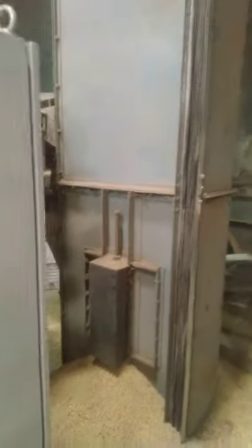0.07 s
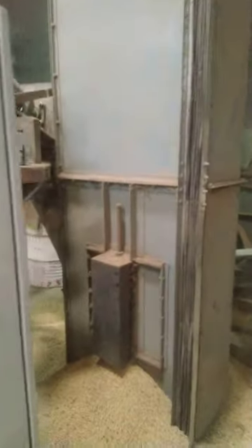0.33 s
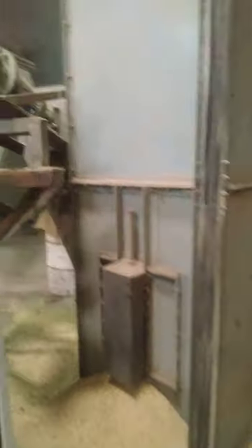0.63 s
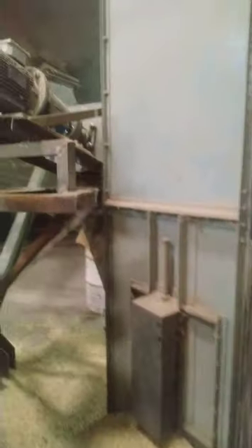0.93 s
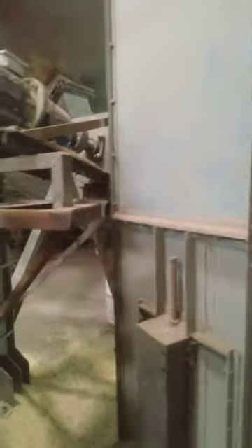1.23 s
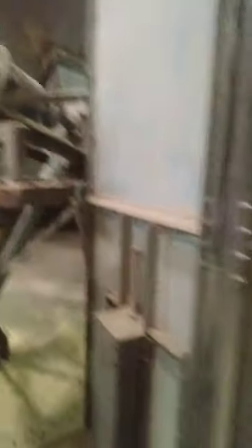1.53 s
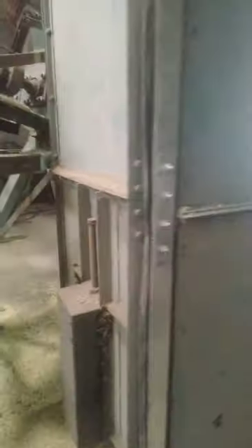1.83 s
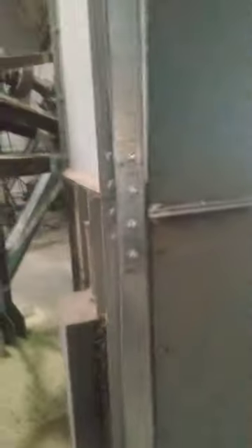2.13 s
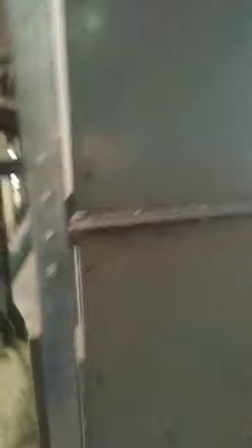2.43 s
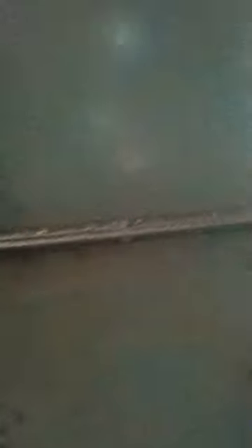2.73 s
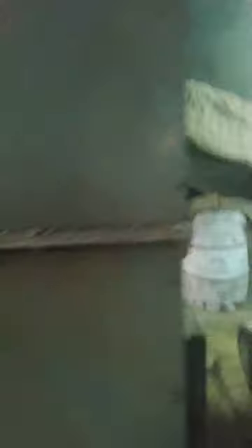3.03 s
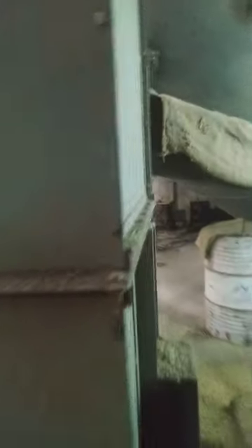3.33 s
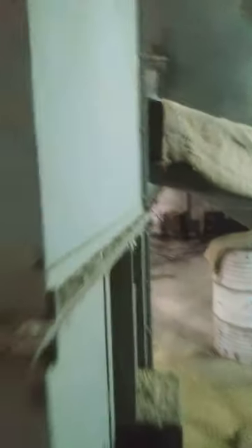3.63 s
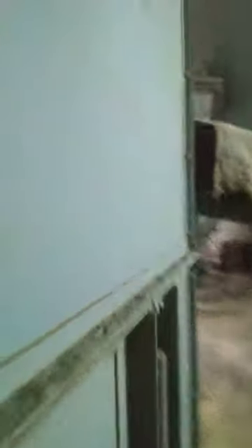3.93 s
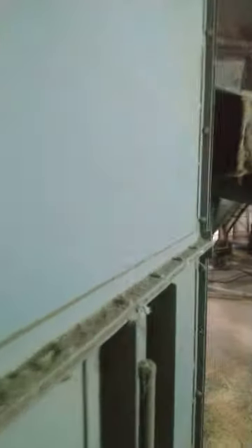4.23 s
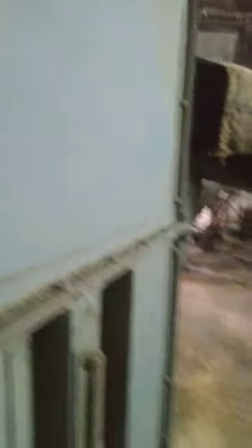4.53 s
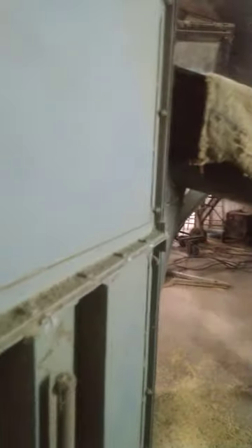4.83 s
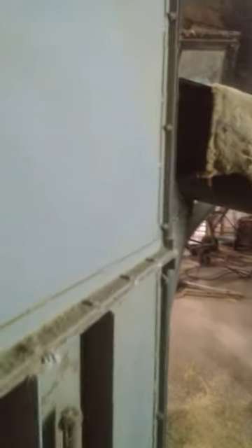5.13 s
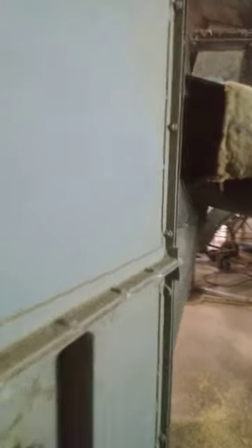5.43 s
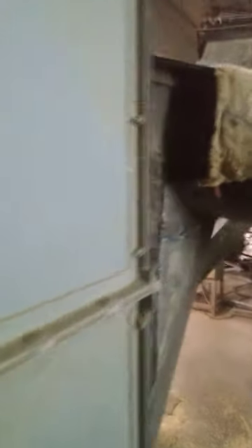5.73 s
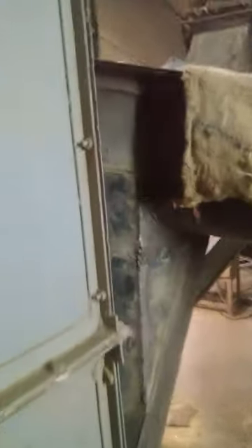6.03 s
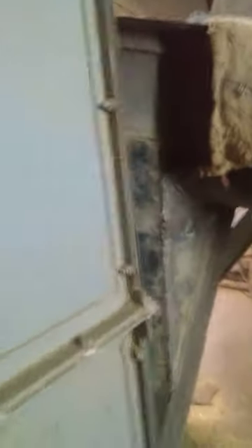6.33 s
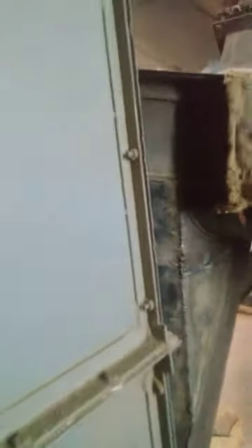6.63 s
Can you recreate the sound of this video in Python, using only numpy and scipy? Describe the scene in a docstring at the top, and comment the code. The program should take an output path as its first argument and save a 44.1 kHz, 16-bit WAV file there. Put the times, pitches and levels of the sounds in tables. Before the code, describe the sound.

Heavy machinery drones without a break inside a metal building: rumbling ducts, a rush of air, wavering motors and the hiss of sliding grain. As the microphone moves along the steel casing, hollow tones shift and the drone rises slightly. Stray kernels give a few small ticks, the fan's hum grows to its fullest, and a low hollow resonance builds near the end.

```python
"""A grain dryer runs in a sheet-metal hall while a phone is carried slowly past its casing.
It opens on duct rumble, rushing air, hissing grain and thin motor tones, with hollow resonances
swelling between the steel panels. Around 2 s the casing drone rises; then a few kernels tick on steel.
From 4 s the casing shades the air and the big fan's blade hum is at its fullest.
Near 6 s the hum eases back and a deep hollow boom swells over the rumble."""
import sys
import numpy as np
from scipy import signal
from scipy.fft import irfft, next_fast_len
from scipy.io import wavfile
from scipy.ndimage import map_coordinates

SR = 44100
rng = np.random.default_rng(int(sys.argv[2]) if len(sys.argv) > 2 else 0)


def to_wav(s):
    """Save 16-bit WAV."""
    ch = np.atleast_2d(s).T  # columns
    pcm = np.round(np.clip(ch, -1, 1) * 32767)  # PCM
    wavfile.write(sys.argv[1], SR, pcm.astype(np.int16))


N = 295029
T = np.arange(N) / SR
SIZE = next_fast_len(N, real=True)
FREQ = np.maximum(np.arange(SIZE // 2 + 1) * SR / SIZE, 1)

# how far the casing screens the phone from air, grain and drone: (time [s], shade [0-1])
SHADE = [(0, 0.02), (1.8, 0.22), (3.6, 0.39), (4.35, 0.93), (5.3, 0.98), (6, 0.57), (6.69, 0.9)]


def undb(db):
    """Decibels to gain."""
    return 10 ** (np.asarray(db) / 20)


def curves(table):
    """Each column of a table, joined by straight lines in time."""
    s, *columns = np.transpose(table)
    return [np.interp(T, s, c) for c in columns]


def spectra(table):
    """Each column of a table, joined by straight lines in log frequency."""
    hz, *columns = np.transpose(table)
    return [np.interp(np.log(FREQ), np.log(hz), c) for c in columns]


def pan(db):
    """Left and right gains for a pan in dB, left minus right."""
    return undb(np.array([[.5], [-.5]]) * db)


def unit(pair):
    """Scale a stereo pair so that its middle has rms 1."""
    return pair / np.std(pair.mean(axis=0))


def wander(rate):
    """Smooth random drift with about `rate` turns a second and a spread near 1."""
    knots = rng.standard_normal(1024)
    return map_coordinates(knots, [T * rate], order=2, mode="wrap")


def passing(s, reach):
    """Nearness 0-1 of a spot that the phone passes at time s."""
    return np.exp(-((T - s) / reach) ** 2)


def swell(spots):
    """Rise in dB while the phone passes loud spots."""
    return sum(db * passing(s, reach) for s, reach, db in spots)


def resample(pair, seconds):
    """Read a stereo loop at moving times."""
    return np.array([np.interp(seconds * SR % SIZE, np.arange(SIZE), channel) for channel in pair])


def microphone_ports():
    """Stereo image: likeness of the two ports and their complex gains at each frequency."""
    # (frequency [Hz], likeness [0-1], pan [dB], lead of the left port [rad])
    stereo_image = [(60, 0.99, 6, 0.4), (195, 0.92, 2, -0.18), (414, 0.65, 4, 0.07), (700, 0.47, 3.5, 0.6),
                    (1230, 0.6, 5, 1.47), (2130, 0.15, 7, 2), (4370, 0, 6, -0.5), (8040, 0.06, 1, -1.3),
                    (14000, 0, 0.5, 0)]
    likeness, pan_db, lead = spectra(stereo_image)
    gains = pan(pan_db) * np.exp(1j * np.array([[.5], [-.5]]) * lead)
    return np.clip(likeness, 0, .995), gains


def turbulence(likeness):
    """Random spectra at the two ports: long waves reach both alike, short ones differ."""
    shared, own = rng.standard_normal((2, len(FREQ))) + 1j * rng.standard_normal((2, len(FREQ)))
    return np.array([shared, likeness * shared + np.sqrt(1 - likeness ** 2) * own])


def hall_noise(ports, colour, db):
    """Diffuse noise of a given colour, riding a moving level, as the two ports pick it up."""
    likeness, gains = ports
    spectrum = turbulence(likeness) * undb(spectra(colour)[0]) * gains
    return unit(irfft(spectrum, SIZE)[:, :N]) * undb(db)


def tone(hz, waver_db, waver_hz, drift_rad):
    """A rotor tone of rms near 1; uneven inflow shakes its strength and phase."""
    phase = 2 * np.pi * (hz * T + rng.random()) + drift_rad * wander(waver_hz)
    return np.sqrt(2) * np.sin(phase) * undb(waver_db * wander(waver_hz))


def motors(pan_db=4):
    """Thin, wavering tones of the conveyor and auger drives; other tones, near the fan's shaft orders, carry
    only to one spot."""
    # heard throughout: (pitch [Hz], level [dB])
    drives = [(59, -45.5), (89, -37.5), (148, -39), (261, -43), (585, -41.5), (799, -45), (955, -52)]
    # heard in passing: (time [s], reach [s], pitch [Hz], level [dB])
    tone_spots = [(4.4, .55, 487, -32), (5, .45, 493, -35), (6.45, 0.34, 582, -35)]
    bed = sum(undb(db) * tone(hz, waver_db=3, waver_hz=1.905, drift_rad=0.4) for hz, db in drives)
    local = sum(undb(db) * passing(s, reach) * tone(hz, waver_db=2, waver_hz=7.4, drift_rad=0.59)
                for s, reach, hz, db in tone_spots)
    return pan(pan_db) * (bed + local)


def sliding_grain(ports, surge_db, hiss_db=-32.5, sizzle_db=-50, shade_db=-3, wall_share=0.2):
    """Grain hisses in the ducts and sizzles up close, where it slides behind the steel wall."""
    # the hiss and its bright top: (frequency [Hz], relative level [dB])
    hiss_colour = [(1800, -32), (2500, 1), (3400, -1), (4200, -4.5), (5000, -5.5), (5700, -11),
                   (6400, -15.5), (7300, -18.5), (8100, -30.5), (9500, -23.5), (14000, -34), (15200, -47)]
    sizzle_colour = [(4500, -12), (5600, 1.5), (6500, 10), (7300, 1.5), (7900, -9), (9000, 2.5), (11000, 3),
                     (13500, -0.5), (14300, -4), (15000, -24)]
    # close passes of the wall: (time [s], reach [s], rise [dB])
    wall_spots = [(2.8, 1, 3.1), (6.05, 0.55, 3.5)]
    shade, = curves(SHADE)
    dim_db = shade_db * shade ** 2  # only deep shade dims the grain
    wall_db = swell(wall_spots)
    trickle_db = surge_db + .55 * wander(25)  # grain slides less evenly than air flows
    hiss = hall_noise(ports, hiss_colour, hiss_db + dim_db + wall_share * wall_db + trickle_db)
    sizzle = hall_noise(ports, sizzle_colour, sizzle_db + wall_db + trickle_db)
    return hiss + sizzle


def kernel_ticks(ports, grit_db=2, attack_s=0.0017):
    """Stray kernels hit steel nearby: a gritty snap, with a short ping where the panel is free to ring."""
    # (time [s], level [dB], decay t60 [s], ping against snap [dB], pan [dB])
    hits = [(2.642, -32.5, 0.12, -12, 4), (4.287, -24, 0.058, 1, 3), (4.638, -32.5, 0.12, -6, 4),
            (6.231, -31, 0.071, -10, 0)]
    # the snap's spectrum and the steel's modes: (frequency [Hz], relative level [dB])
    snap_colour = [(1200, -25), (2600, 15), (4200, 14), (7000, 11.5), (8200, 5), (11500, 9), (16000, 7)]
    steel_modes = [(2740, 0.5), (3420, -3)]
    snap = hall_noise(ports, snap_colour, grit_db * wander(500))
    ping = sum(undb(db) * np.sin(2 * np.pi * hz * T) for hz, db in steel_modes)
    out = np.zeros((2, N))
    for s, db, t60, ping_db, pan_db in hits:
        age = np.maximum(T - s, 0)
        envelope = np.minimum(age / attack_s, 1) * undb(db - 60 * age / t60)
        out += envelope * (snap + undb(ping_db) * ping) * pan(pan_db)
    return out


def casing_drone(ports, surge_db, base_db=-25, shade_db=-1):
    """The casing's low-mid drone, breathing with the airflow."""
    # (frequency [Hz], relative level [dB])
    drone_colour = [(170, -52), (290, -5.5), (390, -1), (480, -1.5), (550, -4.5), (660, -3), (760, -6),
                    (860, -26), (1200, -68)]
    # (time [s], reach [s], rise [dB])
    loud_spots = [(2.25, 1.96, 3.3)]
    shade, = curves(SHADE)
    return hall_noise(ports, drone_colour, base_db + shade_db * shade + swell(loud_spots) + surge_db)


def rushing_air(ports, surge_db, base_db=-21, shade_db=-5.5):
    """The midrange rush of the fan's air, ducking where the casing screens it."""
    # (frequency [Hz], relative level [dB])
    rush_colour = [(550, -32), (790, 1.5), (930, 2), (1020, 1.5), (1200, 3.5), (1600, 0), (1850, -1.5),
                   (2200, -4), (2500, -11), (3400, -53)]
    shade, = curves(SHADE)
    return hall_noise(ports, rush_colour, base_db + shade_db * shade + surge_db)


def duct_rumble(ports, base_db=-19):
    """Air in the ducts lays down the low end."""
    # (frequency [Hz], relative level [dB])
    rumble_colour = [(20, -33), (33, -32), (42, -13), (50, -5.5), (80, -6.5), (98, -0.5), (135, -0.5),
                     (180, -5), (225, -7), (270, -11), (340, -17), (600, -71)]
    # (time [s], reach [s], rise [dB])
    loud_spots = [(.6, 0.46, 0.5), (6.2, 0.81, 2)]
    return hall_noise(ports, rumble_colour, base_db + swell(loud_spots))


def hollows(ports, trim_db=-1):
    """The roar rings between steel panels, swelling and sliding as the phone crosses pressure peaks."""
    # (time [s], reach [s], pitch [Hz], width [Hz], glide [Hz/s], level before trim [dB], pan [dB])
    standing_waves = [(.1, 0.74, 378, 55.56, 1.5, -27.5, 6), (.2, 0.69, 1266, 50.93, -45.5, -26, 17),
                      (.2, .7, 2130, 150, -0.5, -34, 10), (.1, 0.48, 560, 70, -1.5, -35, 6),
                      (.3, 0.91, 932, 70, 0.5, -28.5, 1), (.35, 0.74, 1110, 83.33, 40.5, -29, 10),
                      (.55, 0.76, 133, 45, 0.5, -24, 7), (.58, 0.2, 1220, 50, -3, -27, 6),
                      (1.05, 0.45, 1860, 120, -0.5, -29, 21), (1.15, .6, 3330, 480, -100, -38, 10),
                      (1.1, 0.35, 528, 42, 40, -23.3, 4), (1.35, 1, 454, 57, 14, -30, 13),
                      (1.4, 0.23, 365, 25, 2, -29.5, 7), (1.45, 0.6, 915, 64.81, 1, -30.5, 17),
                      (1.55, 0.24, 572, 85, 33, -23.3, 12), (1.7, 1, 1100, 140, 1, -27.5, 10),
                      (1.75, 0.75, 1320, 180, 0, -28.5, 19), (1.848, 0.58, 676, 95, -38.5, -24.5, 8),
                      (2.4, .42, 438, 115, -31, -24, 3), (2.55, 0.34, 806, 70, -3, -28.5, 12),
                      (2.55, .35, 514, 50.93, -5.5, -28, 0), (3.15, 0.74, 660, 94, 1, -26, 11),
                      (3.399, 0.85, 906, 70, 56, -31, 9), (3.85, 0.36, 790, 45, -4, -39, -1),
                      (4.0, 0.22, 673, 48.6, -4, -30, 15), (4.55, 0.59, 485, 26, 11.5, -33.5, -3),
                      (4.9, 0.47, 863, 75.6, -2, -31, 4), (5.85, 0.52, 650, 45.36, 1, -26.5, 2),
                      (6.1, 0.62, 533, 48, 1, -28.5, 1), (6.2, 0.93, 168, 58.3, 0.5, -19.5, 6),
                      (6.55, 0.55, 633, 53, 21.5, -26.5, 0)]
    likeness, _ = ports
    roar = turbulence(likeness)
    out = np.zeros((2, N))
    for s, reach, hz, width, glide, db, pan_db in standing_waves:
        resonance = 1 / (1 + ((FREQ - hz) / (.5 * width)) ** 2)
        ring = unit(irfft(roar * resonance, SIZE) * pan(pan_db))
        bend_s = .5 * glide / hz * (T - s) ** 2  # varispeed slides the pitch
        ring = resample(ring, T + rng.random() * T[-1] + bend_s)
        out += ring * undb(db + trim_db) * passing(s, reach)
    return out


def fan(shaft_hz=24.2, blades=8, blade_db=-14.5, orders_trim_db=0.5, orders_follow=0.62, pan_db=4.5):
    """The big fan hums at its blade rate; a far fan turns slightly slower and beats against it."""
    # how open the path from fan to phone is: (time [s], share of full pressure [0-1])
    fan_path = [(0, 0.12), (1.1, 0.3), (1.7, 0.08), (2.4, 0.38), (2.8, 0.51), (3.55, 0.62), (4.05, 0.9),
                (5.5, 0.72), (5.85, 0.35), (6.69, 0.45)]
    # weaker tones from unequal blades: (multiple of the shaft rate, level before trim and path [dB])
    shaft_orders = [(2, -42), (7, -29.5), (9, -35), (10, -34.5), (11, -32.5), (16, -35.5), (20, -37.5)]
    path = np.maximum(curves(fan_path)[0], .01)
    hum = tone(blades * shaft_hz, waver_db=0.94, waver_hz=8.3, drift_rad=0.1) * undb(blade_db) * path
    orders = sum(undb(db) * tone(k * shaft_hz, waver_db=1.5, waver_hz=2.97, drift_rad=0.26)
                 for k, db in shaft_orders)
    orders *= undb(orders_trim_db) * path ** orders_follow  # these duck less than the hum
    far_fan = tone(hz=189, waver_db=0.5, waver_hz=1.51, drift_rad=0.3) * undb(-40)
    return (hum + far_fan + orders) * pan(pan_db)


def scene():
    """All the machinery as it reaches the phone."""
    ports = microphone_ports()
    tones = fan() + motors()
    surge_db = .3 * wander(5.3)  # one wavering flow moves drone, air and grain together
    flow = casing_drone(ports, surge_db) + rushing_air(ports, surge_db) + sliding_grain(ports, surge_db)
    return tones + flow + duct_rumble(ports) + hollows(ports) + kernel_ticks(ports)


def record(dry, top_hz=15100):
    """The phone rounds its highest peaks and cuts the top."""
    rounded = dry / (1 + dry ** 8) ** (1 / 8)
    return signal.sosfilt(signal.ellip(8, .2, 70, top_hz, fs=SR, output="sos"), rounded)


dry = scene()
out = record(dry)
to_wav(out)
```